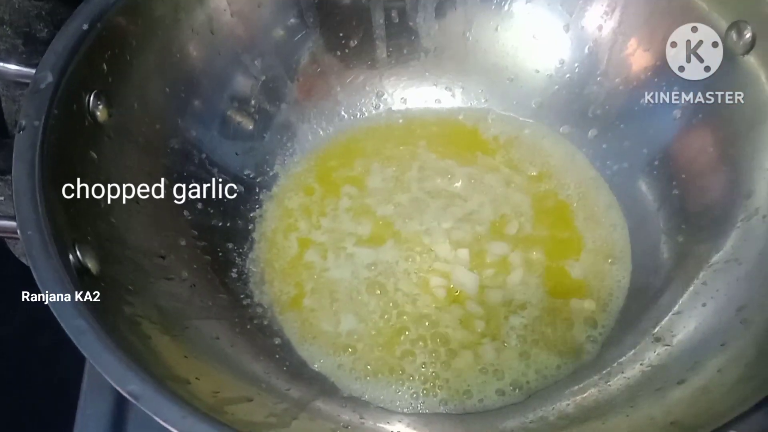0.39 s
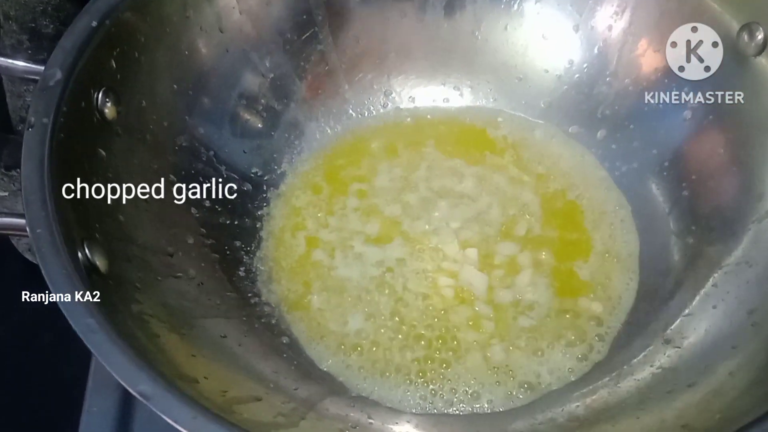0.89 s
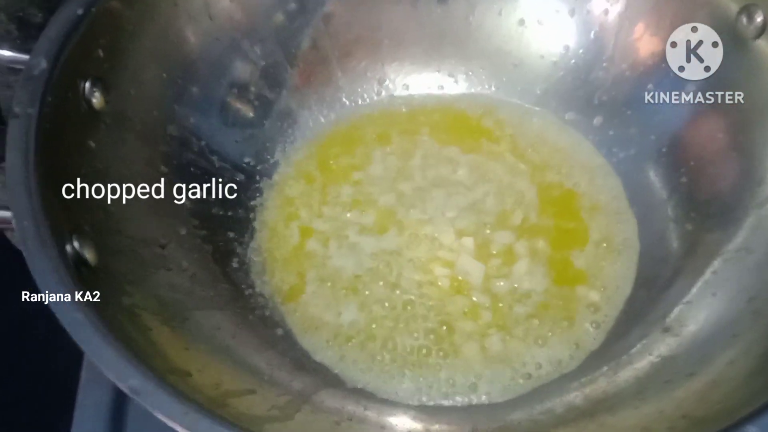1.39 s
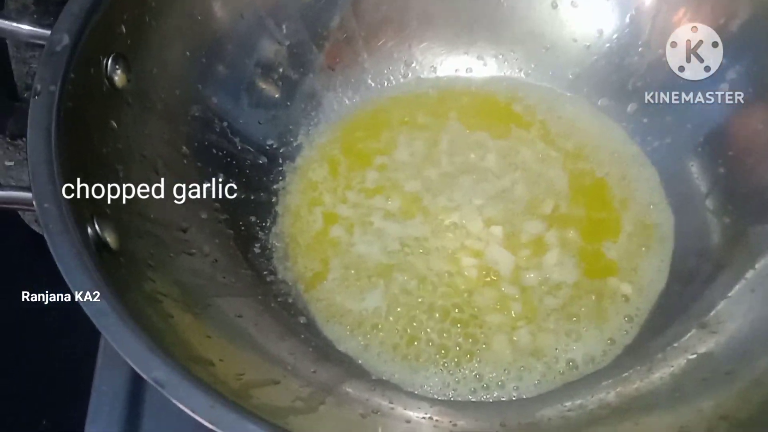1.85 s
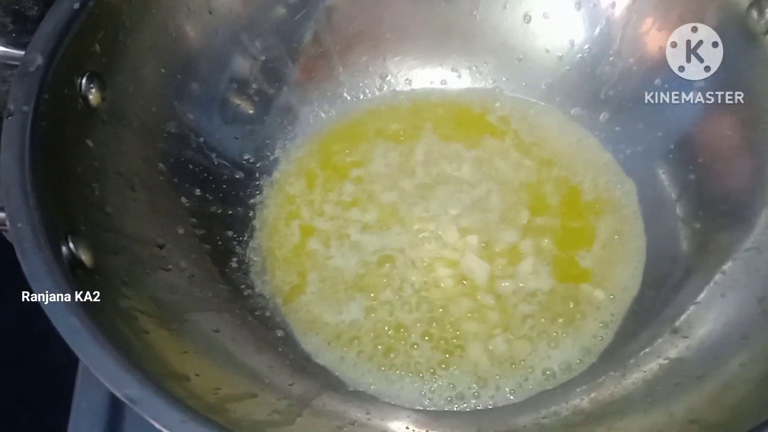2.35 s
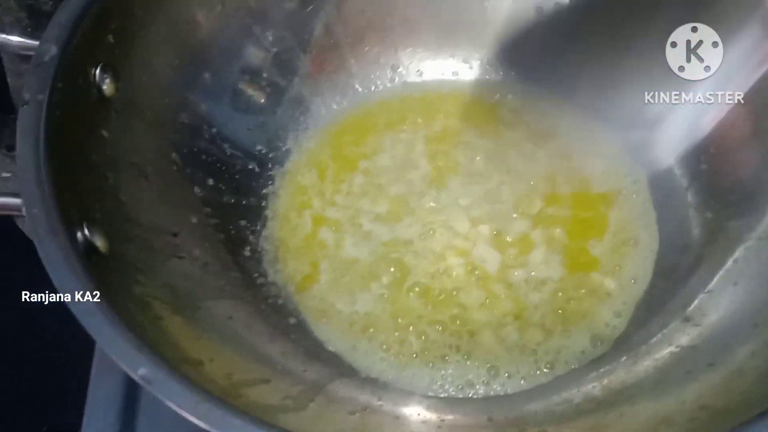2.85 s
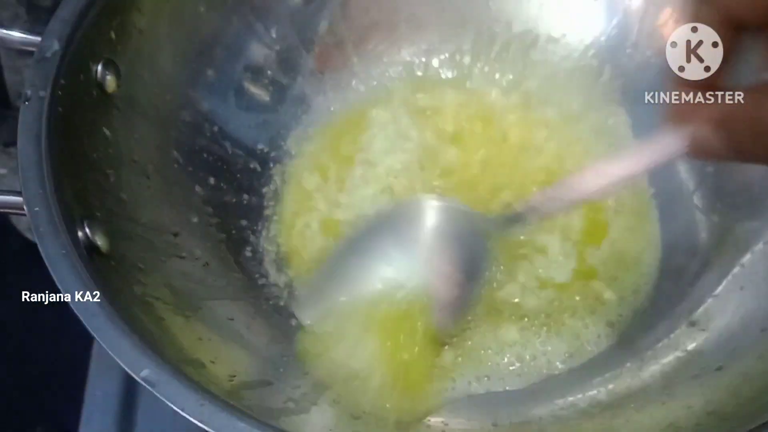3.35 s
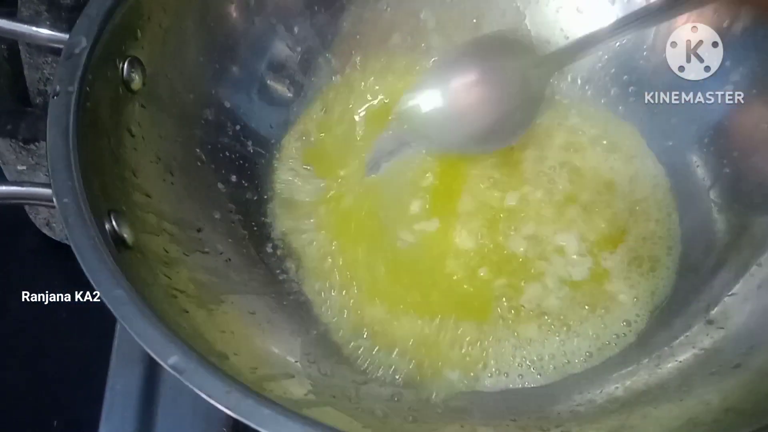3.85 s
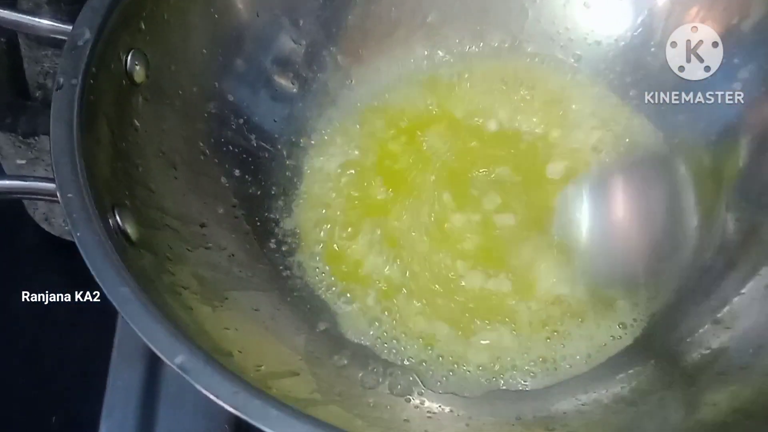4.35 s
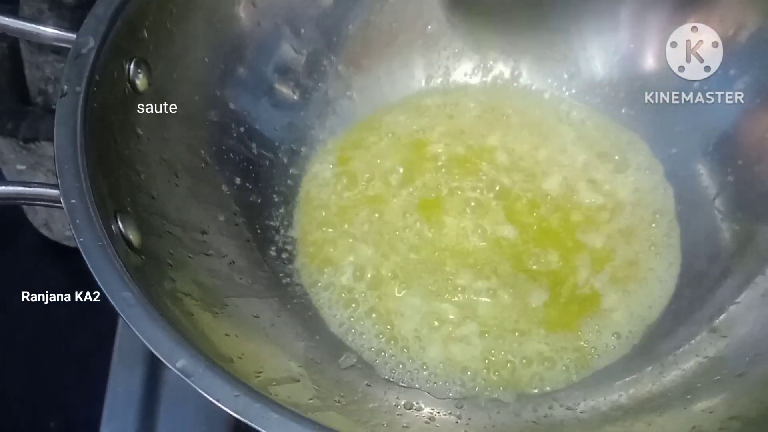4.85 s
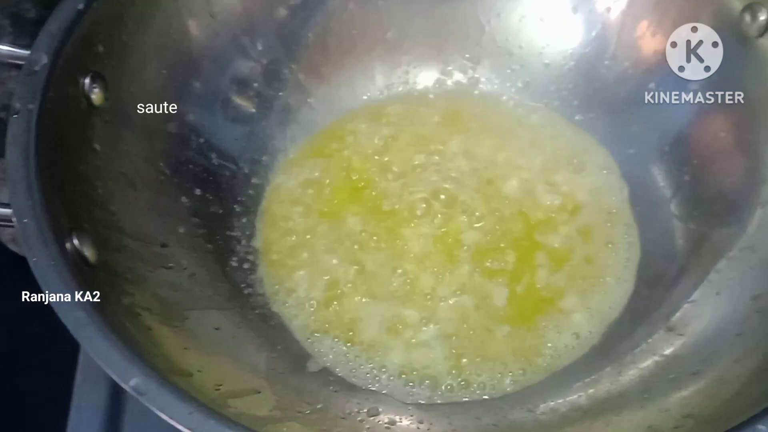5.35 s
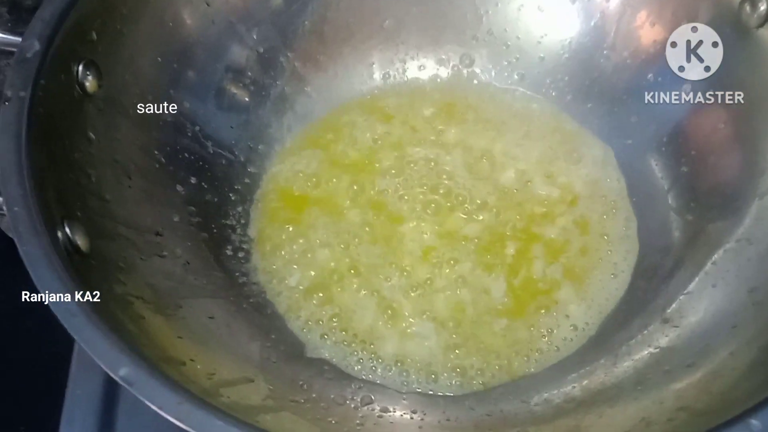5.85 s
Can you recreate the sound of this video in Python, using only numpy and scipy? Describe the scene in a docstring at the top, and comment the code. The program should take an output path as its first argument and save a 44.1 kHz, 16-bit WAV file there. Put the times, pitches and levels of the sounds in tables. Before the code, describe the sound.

Fine, bright sizzling of garlic in melted butter runs throughout, close to the microphone. Soft dull knocks sound off in the small kitchen during the first second, then two short hard clatters around one and a half seconds. From about three seconds a metal spoon taps and scrapes the steel pan, stopping before five, leaving the sizzle over steady faint hiss and low rumble.

```python
"""Chopped garlic sizzles in melted butter in a steel pan: steam bubbles, as damped sines, burst in clumps.
A spoon taps and scrapes the pan, close by in a small kitchen: noise and decaying modes ring the metal.
Dull knocks (damped low sines) and two clatters (coloured noise bursts) sound further off in the room.
Beneath lie steady hiss and low rumble, both filtered noise, and a faint wavering hum that swells briefly."""
import sys
import numpy as np
from scipy import signal
from scipy.fft import rfft, irfft, next_fast_len
from scipy.io import wavfile
from scipy.ndimage import uniform_filter1d, map_coordinates

SR = 44100
rng = np.random.default_rng(int(sys.argv[2]) if len(sys.argv) > 2 else 0)


def natural_amplitude(level_db):
    """Convert a level in decibels to a linear amplitude factor, elementwise."""
    exponent = np.asarray(level_db, float) / 20
    return 10 ** exponent


def transcribe(u):
    """Save the signal u as a 16-bit wav file named by the first command-line argument.

    u: samples, shape (n,) or (channels, n), limited to [-1, 1]; the rate is SR.
    q: integer samples, one column per channel.
    """
    v = np.clip(np.atleast_2d(u).T, -1, 1)
    q = np.round(v * 32767).astype(np.int16)
    wavfile.write(sys.argv[1], SR, q)


N = 263826  # length in samples

# Steady boiling. Each row: time in seconds, then small bubbles, finest fizz and large bubbles in dB.
BOILING = [(0.0, -49, -59, -61), (0.33, -58.5, -59.5, -74), (0.55, -52.5, -59.5, -73),
           (0.92, -61.5, -63, -65.5), (1.4, -50.5, -58.5, -64), (1.65, -61, -60, -65), (2.1, -57, -61, -57),
           (2.6, -53, -60, -54.5), (3.1, -51, -58.5, -57.5), (3.5, -54.5, -51, -47.5),
           (3.9, -57, -54.5, -53), (4.46, -65, -57.5, -60.5), (4.7, -59, -60.5, -68),
           (5.06, -48.5, -72, -59.5), (5.45, -60, -82, -62), (5.75, -52.5, -77, -65.5),
           (5.98, -56.5, -60, -62)]
# Bubble sizes, in the same order. Each row: pitch in Hz, spread in octaves, life in cycles, bursts per second.
BUBBLE_SIZES = [(4900, 0.168, 5.7, 680), (7500, 0.093, 5.1, 710), (3382, 0.212, 4.1, 950)]
# Loudest single bursts. Each row: start in seconds, level in dB, pitch in Hz.
SINGLE_BURSTS = [(0.059, -34.5, 3890), (0.1491, -46, 5140), (0.167, -35, 5000), (0.242, -32, 5850),
                 (0.3037, -31.5, 4640), (0.4599, -32.5, 3870), (0.4882, -34.5, 4150), (0.5144, -35, 4730),
                 (0.5511, -32, 4170), (0.87, -35, 4900), (0.8913, -33, 4900), (0.9383, -41, 3880),
                 (1.2336, -56, 3700), (1.3958, -32, 5050), (1.939, -50, 4900), (1.968, -28, 4000),
                 (1.983, -23.5, 3900), (2.0303, -30.5, 5030), (2.109, -36, 4870), (2.187, -43, 2700),
                 (2.356, -36.5, 2960), (2.376, -34, 3170), (2.458, -43, 2970), (2.5278, -35, 5400),
                 (2.595, -39, 3500), (2.7017, -40.5, 3760), (3.4555, -41, 3880), (3.518, -30, 3750),
                 (3.626, -38, 5270), (3.717, -35, 3680), (3.775, -35, 4600), (4.109, -38, 3770),
                 (4.402, -36, 4170), (4.319, -29, 4500), (4.347, -33, 4900), (4.546, -32, 4860),
                 (4.6572, -36.5, 4250), (4.774, -42, 4670), (4.822, -34, 4650), (4.952, -37, 4570),
                 (5.221, -40, 4700), (5.2574, -31, 4860), (5.2997, -31, 4860), (5.422, -36, 4650),
                 (5.4826, -40.5, 4700), (5.5544, -44, 4800), (5.592, -36.5, 5070), (5.6046, -37.5, 4770),
                 (5.657, -38, 4720), (5.663, -45, 4750), (5.6789, -29, 4800), (5.684, -28, 4760),
                 (5.704, -35, 4850), (5.7376, -36, 4600), (5.8146, -34.5, 4730), (5.845, -41, 4730),
                 (5.857, -35.5, 4860), (5.9174, -38, 4600)]


def sizzle():
    """Random superposition: bubbles of three sizes burst by chance under clumps, spits and loud single bursts."""
    out = clumps() + spits()
    for (hz, spread, cycles, rate), db in zip(BUBBLE_SIZES, curves(BOILING)):
        draw = rng.random((int(rate * N / SR), 2))
        chance = rng.standard_normal((len(draw), 2))
        start = draw[:, 0] * N / SR
        size = natural_amplitude(np.minimum(-3.5 * np.log(draw[:, 1]), 13))  # few big, many small
        pitch = hz * 2 ** (spread * chance[:, 0])
        life = cycles * np.exp(0.76 * chance[:, 1])
        grains = bubbles(start, pitch, size, life, rise=0.022)
        flicker = natural_amplitude(1.64 * wobble(35) + 1.13 * wobble(14))
        out += natural_amplitude(db) * unit(flicker * grains)
    s, db, hz = np.transpose(SINGLE_BURSTS)
    return out + bubbles(s, hz, natural_amplitude(db), np.full(len(s), 5.5), rise=0.01)


def bubbles(s, hz, peak, cycles, rise):
    """Damped oscillation: sines with a soft start whose pitch climbs as each bubble opens."""
    k = np.arange(320)
    u = k / SR * (hz / cycles)[:, None]  # time in lives
    envelope = np.e * 2 * u * np.exp(-2 * u)
    phase = 2 * np.pi * cycles[:, None] * (u + rise * u * u / 2)
    at = (s * SR).astype(int)[:, None] + k
    waves = peak[:, None] * envelope * np.sin(phase)
    return np.bincount(at.ravel(), waves.ravel(), N + SR)[:N]


# Patches of like-sized bubbles boiling up together.
# Each row: middle in seconds, length in seconds, level in dB, pitch in Hz.
BUBBLE_CLUMPS = [(0.077, 0.037, -47, 4000), (.12, 0.032, -53.5, 3900), (0.182, 0.047, -44, 4290),
                 (0.208, .05, -44, 4750), (.245, 0.042, -53, 5550), (0.288, 0.051, -59, 7500),
                 (0.312, 0.035, -46.5, 4870), (0.333, .03, -62, 7840), (0.404, .04, -49.5, 5300),
                 (0.421, 0.033, -54, 7500), (0.488, 0.051, -51, 4620), (0.534, 0.051, -51, 7500),
                 (0.557, .04, -51, 4370), (0.609, 0.038, -52, 3480), (0.726, 0.043, -47, 5460),
                 (.76, 0.037, -48, 5850), (0.833, 0.034, -45.5, 4900), (.88, 0.034, -54, 4900),
                 (0.956, 0.03, -55, 3700), (0.998, 0.037, -54, 4900), (1.139, 0.098, -48, 4300),
                 (1.143, 0.029, -49, 7500), (1.26, .06, -45.5, 3510), (1.699, 0.035, -47, 5030),
                 (1.958, 0.051, -41.5, 4840), (1.998, 0.055, -37, 4680), (2.121, 0.043, -57, 4900),
                 (2.205, .06, -45.5, 4660), (2.271, 0.036, -45.5, 5850), (2.29, .06, -49.5, 3230),
                 (2.373, 0.047, -47, 3220), (2.392, .04, -42.5, 5380), (2.529, 0.027, -53, 3750),
                 (2.612, 0.042, -47, 3460), (2.662, .06, -47.5, 3400), (2.767, .04, -44.5, 3700),
                 (2.934, .12, -41.5, 3700), (3.077, 0.086, -43, 4240), (3.19, 0.027, -52, 5600),
                 (3.496, .1, -37.5, 3650), (3.49, 0.11, -38, 7500), (3.806, 0.044, -41, 3300),
                 (3.835, .07, -38.5, 4900), (3.823, 0.037, -39.5, 7500), (4.089, 0.056, -44, 7700),
                 (4.109, 0.042, -43, 4700), (4.186, 0.064, -44, 4900), (4.318, 0.029, -48, 4670),
                 (4.362, 0.051, -42, 4800), (4.404, 0.052, -40.5, 3950), (4.474, 0.022, -41, 4400),
                 (4.55, 0.034, -48, 4900), (4.665, 0.027, -47.5, 4530), (4.845, 0.09, -46.5, 4590),
                 (5.001, 0.059, -46, 4400), (5.1, 0.047, -46, 4240), (5.246, 0.057, -46.5, 4550),
                 (5.43, 0.057, -46.5, 4660), (5.488, .03, -60, 3200), (5.605, .05, -52, 4900),
                 (5.691, 0.064, -44.5, 4300), (5.811, 0.049, -47.5, 3960), (5.915, 0.042, -49, 4370)]


def clumps(count=48):
    """Clustered bursting: each patch breaks out suddenly and thins away, its bubbles scattered about one size."""
    s, length, db, hz = np.transpose(BUBBLE_CLUMPS)[:, :, None]
    draw = rng.random((len(BUBBLE_CLUMPS), count, 3))
    chance = rng.standard_normal((len(BUBBLE_CLUMPS), count, 2))
    at = np.abs(s + length * (1.6 * draw[..., 0] * draw[..., 1] - 0.45))
    size = natural_amplitude(db + np.minimum(-3.0 * np.log(draw[..., 2]), 9) - 6)
    pitch = hz * 2 ** (0.12 * chance[..., 0])  # spread in octaves
    life = 5.68 * np.exp(0.42 * chance[..., 1])  # cycles
    return bubbles(at.ravel(), pitch.ravel(), size.ravel(), life.ravel(), rise=0.025)


# Distinct tiny spits, short and high. Each row: start in seconds, level in dB, pitch in Hz.
CLEAR_SPITS = [(2.562, -39, 14800), (2.831, -44, 9300), (5.542, -58, 12800), (5.7139, -47, 15000),
               (5.7349, -53, 15000), (5.9414, -57, 9260)]


def spits():
    """Flash evaporation: water droplets turn to steam in the fat, as clicks with a life of 2.5 cycles."""
    count = int(33 * N / SR)  # fainter ones at random, 33 per second
    draw, chance = rng.random((count, 2)), rng.standard_normal(count)
    s, db, hz = np.transpose(CLEAR_SPITS)
    s = np.append(s, draw[:, 0] * N / SR)
    db = np.append(db, -57 + np.minimum(-3.5 * np.log(draw[:, 1]), 10))
    hz = np.append(hz, np.clip(5970 * 2 ** (0.75 * chance), 1500, 15000))
    return bubbles(s, hz, natural_amplitude(db), np.full(len(s), 2.5), rise=0.01)


# Steady shaking of the pan. Each row: time in seconds, pan wall in dB, spray in dB.
SHAKING = [(0.0, -65.5, -79), (0.4, -71.5, -84), (1.4, -78.5, -82), (2.0, -67, -81), (2.9, -66, -75),
           (3.2, -59.5, -63), (3.38, -58.5, -62), (3.48, -53.5, -64), (3.65, -56.5, -68), (3.8, -60, -74),
           (3.9, -62, -78), (4.3, -69, -72), (4.6, -71, -85), (4.8, -74, -73), (5.5, -80, -84),
           (5.98, -65, -78)]
# Brief jolts of the wall as big bubbles collapse on it. Each row: middle and length in seconds, level in dB.
WALL_JOLTS = [(0.13, 0.021, -74), (0.223, 0.032, -59.5), (0.832, 0.034, -61), (0.952, .05, -63.5),
              (1.217, .06, -63), (1.327, 0.035, -63), (2.131, 0.024, -60), (2.178, .04, -58.5),
              (2.273, 0.047, -64), (2.61, 0.094, -61.5), (4.90, 0.044, -65.5), (5.106, 0.024, -69),
              (5.235, 0.028, -67), (5.374, 0.035, -63), (5.65, 0.037, -70)]
# Stirring strokes. Each row: middle and length in seconds, pan wall in dB,
# then low, middle and high spoon modes in dB.
STIRRING = [(2.965, 0.027, -57, -74, -73, -66), (3.26, 0.12, -54, -67, -60, -55.5),
            (3.442, 0.027, -48, -66, -57, -59), (3.494, 0.061, -48.5, -43, -46, -50),
            (3.628, 0.1, -67, -55, -70, -54), (3.698, 0.039, -53, -54, -54, -52.5),
            (3.742, 0.068, -50.5, -63, -64, -65), (3.809, 0.085, -53.5, -47, -53, -50),
            (3.962, 0.12, -58, -66, -59, -60), (4.038, 0.09, -55, -59, -73, -59),
            (4.162, 0.046, -58, -57, -50, -69), (4.212, 0.055, -58, -61, -48, -60),
            (4.31, 0.067, -79, -71, -61, -60), (4.402, 0.12, -59, -66, -71, -62),
            (4.488, 0.089, -60, -56, -64, -57.5), (4.568, 0.074, -75, -63.5, -62, -55.5),
            (4.619, .04, -61.5, -66, -77, -75), (4.745, 0.023, -62, -83, -76, -79)]
# Pan resonances. Each row: frequency in Hz, width in Hz, relative level in dB.
PAN_MODES = [(328, 16, -14.5), (1063, 120, -6.5), (1390, 98, -6.5), (1802, 126, 2.5), (3240, 57, -9),
             (3703, 95, 3.5), (4420, 1100, -6.5)]
# Spectrum of friction noise. Each row: frequency in Hz, relative density in dB per Hz.
FRICTION = [(200, -1.5), (700, -1), (2500, 4.5), (5000, 2), (9000, -19), (12000, -36), (15500, -48)]
# Spectrum of fine spray. Each row: frequency in Hz, relative density in dB per Hz.
SPRAY = [(8000, 2), (10000, -15.5), (12000, -6.5), (13500, -13), (15500, -21)]


def pan():
    """Forced resonance: short irregular jolts ring the pan wall; stirred butter throws a fine spray."""
    wall_db, spray_db = curves(SHAKING)
    collapses = swells(*np.transpose(WALL_JOLTS))
    strokes = swells(*np.transpose(STIRRING)[:3])
    wall_gain = np.hypot(natural_amplitude(wall_db), np.hypot(collapses, strokes))
    jolts = rng.standard_normal((2, N)) * natural_amplitude(4.1 * wobble(160) + 1.5 * wobble(30))
    wall = unit(filtered(jolts[0], resonances(PAN_MODES)))
    hiss = unit(filtered(jolts[1], lambda hz: natural_amplitude(along(FRICTION, hz))))
    droplets = rng.standard_normal(N) * natural_amplitude(1.4 * wobble(66) + 2.5 * wobble(20))
    spray = unit(filtered(droplets, lambda hz: natural_amplitude(along(SPRAY, hz) - 60 * (hz < 7000))))
    return wall_gain * (wall + natural_amplitude(-1.5) * hiss) + natural_amplitude(spray_db) * spray


# Spoon modes. Each row: frequency in Hz, relative level in dB, 60 dB decay time in seconds.
SPOON_MODES = [(2228, -17, 0.044), (2867, 4.5, 0.089), (2950, 8, 0.033), (4860, -43, 0.09),
               (5763, -10, 0.076), (7500, -7.5, 0.037), (7700, -2, 0.087), (9070, 5, 0.025)]
# How strongly dragging drives each spoon mode, against a tap: one value in dB per mode.
DRAG_LIFT = [35, -24, -32, 32.5, 5, 17, 18, -1]


def drag():
    """Stick-slip excitation: friction sustains the spoon's modes, which come and go as the contact moves."""
    modes = []
    for (hz, db, t60), lift_db in zip(SPOON_MODES, DRAG_LIFT):
        width = 1.5 * np.log(1000) / np.pi / t60  # Hz, half as wide again as the free ring
        modes.append((hz, width, db + lift_db))
    s, length, _, *levels = np.transpose(STIRRING)
    out = np.zeros(N)
    for db, group in zip(levels, (modes[:3], modes[3:5], modes[5:])):
        slips = rng.standard_normal(N) * natural_amplitude(3.5 * wobble(120))
        singing = sum(filtered(slips * natural_amplitude(2.2 * wobble(12)), resonances([mode])) for mode in group)
        out += swells(s, length, db) * unit(singing)
    return out


# Spoon taps. Each row: start in seconds, level in dB, relative spoon ring in dB, brightness above 7 kHz in dB.
SPOON_TAPS = [(2.947, -35, -3.5, 6.5), (3.2116, -24.5, 2.5, -3.5), (3.425, -38, -14, 11),
              (3.47, -22, -12, -22), (3.691, -22, -15, -4), (3.7972, -28, -12, -22), (3.951, -36, -13, -9),
              (4.033, -29, -34, -20), (4.152, -25.5, -33, -21), (4.258, -30, -23, -21),
              (4.487, -26, -20, -21), (4.603, -39, -9, -8), (4.734, -34, -34, -6)]


def spoon():
    """Impact excitation: every tap knocks the pan wall and rings the spoon, each by its own amount."""
    out, t = np.zeros(N), np.arange(SR // 4) / SR
    strike = (1 - np.exp(-t / 0.000089)) * (1 + 1.2 * natural_amplitude(-60 * t / 0.019))  # louder while still in contact
    for s, db, ring_db, bright_db in SPOON_TAPS:
        lift = lambda hz: bright_db * (hz > 7000)
        ring = np.zeros(len(t))
        for hz, level, t60 in SPOON_MODES:
            mode_db = level + lift(hz) + rng.normal(0, 0.5) - 60 * t / t60
            ring += natural_amplitude(mode_db) * np.sin(2 * np.pi * hz * t)
        crack = natural_amplitude(-60 * t / 0.0034) * rng.standard_normal(len(t))
        treble = lambda hz: natural_amplitude(lift(hz) - 18 * (hz > 10500))
        bass_cut = lambda hz: (hz / (hz - 700j)) ** 2
        knock = filtered(crack, lambda hz: (resonances(PAN_MODES)(hz) + 0.12) * treble(hz) * bass_cut(hz))
        blow = natural_amplitude(ring_db - 16) * ring * strike + natural_amplitude(-5.5) * knock / np.abs(knock).max()
        out = in_room(s, natural_amplitude(db) * blow, -6, out)
    return out


# Dull knocks. Each row: start in seconds, relative level in dB, centre in Hz.
DULL_KNOCKS = [(.004, -49, 470), (0.173, -53, 288), (0.222, -53.5, 293), (0.292, -41.5, 493),
               (0.33, -52, 199), (.350, -48.5, 403), (.432, -44, 394), (.518, -40.5, 467), (.572, -48, 840),
               (.615, -39, 463), (0.813, -36, 504), (5.90, -38.5, 480), (5.917, -45, 520)]


def knocks():
    """Heavily damped vibration: soft distant blows, a rounded hollow swing over a weak low push, then the room."""
    out, t = np.zeros(N), np.arange(1500) / SR

    def swing(hz):
        """Proportional damping: a soft-started sine that dies by 60 dB in 4.5 cycles."""
        return np.sin(2 * np.pi * hz * t) * natural_amplitude(-60 * t * hz / 4.5) * (1 - np.exp(-t / 0.0012))

    for s, db, hz in DULL_KNOCKS:
        out = in_room(s, natural_amplitude(db + 10) * (swing(hz) + natural_amplitude(-12) * swing(182)), -3.0, out)
    return filtered(out, lambda hz: (hz / (hz - 110j)) ** 2)


# Blows of the clatters. Each row: start in seconds, relative level in dB, tilt in dB per octave,
# time to fall 20 dB in seconds, relative high chink in dB.
CLATTER_BLOWS = [(1.458, -40.5, -4, 0.0057, -4), (1.4865, -32, -6, 0.0046, -3),
                 (1.491, -38, 19.5, 0.0046, 15), (1.51, -40, -5, 0.011, -21), (1.556, -46, 3, 0.006, -30),
                 (1.722, -28, 1.5, 0.006, -40), (1.751, -31.5, -1.5, 0.022, -36),
                 (1.757, -22.5, 2.5, 0.0081, -45), (1.772, -26.5, 0.5, 0.008, -49)]
# Colour of the clatters. Each row: frequency in Hz, relative density in dB per Hz.
CLATTER_COLOUR = [(150, -53), (300, -23), (390, -5), (900, 2.5), (2000, 4), (3600, 5), (5200, 0.5),
                  (7000, -10), (8500, -9), (10200, -22.5), (12000, -27), (15500, -47)]
# Low ringing shared by both clatters. Each row: frequency in Hz, width in Hz, relative level in dB.
WARE_MODES = [(248, 52, -18), (417, 8, -0.5), (492, 40, -0.5), (627, 15, 2), (811, 12, 1), (985, 18, 2),
              (1340, 23, 0), (2133, 47, 8), (2233, 27, -1), (2700, 19, 6)]


def clatter():
    """Broadband impact in a reverberant field: hard things rattle together across the room."""
    out, t = np.zeros(N), np.arange(4000) / SR
    lead = 200  # samples of silence ahead of each blow, taken off its start again
    for s, db, tilt_db, length, chink_db in CLATTER_BLOWS:
        rattle = np.pad(rng.standard_normal(len(t)) * natural_amplitude(-20 * t / length), (lead, 0))
        # hard contacts excite every band alike
        lumps = np.sqrt(uniform_filter1d(np.abs(rfft(rattle)) ** 2, size=31))
        even = lambda hz: 1 / np.interp(hz, np.linspace(0, SR / 2, len(lumps)), lumps)
        tilt = lambda hz: natural_amplitude(tilt_db * np.log2(np.clip(hz, 400, 9000) / 2000))
        ringing = lambda hz: natural_amplitude(along(CLATTER_COLOUR, hz)) + natural_amplitude(3) * resonances(WARE_MODES)(hz)
        chink = resonances([(13150, 210, chink_db + 11), (15000, 710, chink_db - 40)])
        blow = filtered(rattle, lambda hz: ringing(hz) * tilt(hz) * even(hz))
        high = filtered(rattle, lambda hz: chink(hz) * even(hz))
        gain = natural_amplitude(db) / np.std(blow[lead:lead + round(length * SR)])
        out = in_room(s - lead / SR, gain * blow, 0.41, out)
        out = in_room(s - lead / SR, gain * high, -9, out)
    return out


# Spectrum of the background noise. Each row: frequency in Hz, relative gain in dB.
NOISE_FLOOR = [(20, -32), (92, -1.5), (187, -9.5), (393, -8.5), (947, -17.5), (1780, -18.5), (2480, -18),
               (4920, -11.5), (6840, -6), (7640, -7.5), (10600, -32), (13500, -41), (15300, -27.5)]
# Rumble. Each row: time in seconds, then relative levels of the deep, low and upper registers in dB.
RUMBLE_LEVELS = [(0.0, -72.5, -72.5, -79), (0.6, -78.5, -72.5, -75.5), (1.2, -78.5, -74, -82),
                 (1.7, -75.5, -75, -77), (2.3, -74.5, -72, -87), (3.0, -78, -77, -78.5),
                 (3.5, -81, -77, -70), (3.9, -75, -77.5, -82), (4.3, -76, -75, -73.5),
                 (4.7, -75, -76.5, -80), (5.05, -75.5, -68.5, -79), (5.4, -71, -76.5, -84),
                 (5.8, -74, -74, -71.5), (5.98, -79, -71, -65.5)]
# Hum. Each row: time in seconds, pitch in Hz, level in dB.
HUM_PATH = [(4.15, 344, -79), (4.3, 364.4, -70), (4.75, 365, -69), (4.9, 346, -76), (5.02, 344, -71.5),
            (5.12, 339, -92)]


def background():
    """Stationary and modulated noise: steady hiss, a rumble whose registers swell apart, a faint wavering hum."""
    def air(lo, hi):
        """Band-pass filtering: noise of the floor's colour between lo and hi in Hz, at rms 1."""
        band = lambda hz: 1 / (1 + (hz / hi) ** 6) / (1 + (lo / (hz + 1)) ** 6)
        return unit(filtered(rng.standard_normal(N), lambda hz: natural_amplitude(along(NOISE_FLOOR, hz)) * band(hz)))

    edges = [(20, 130), (130, 250), (250, 480)]  # Hz
    rumble = sum(natural_amplitude(db + 2.5 + 1.03 * wobble(6)) * air(*edge)
                 for db, edge in zip(curves(RUMBLE_LEVELS), edges))
    hiss = natural_amplitude(-60.2 + 1.5 * wobble(5)) * air(480, SR)
    hz, db = curves(HUM_PATH)
    phase = 2 * np.pi * np.cumsum(hz + 4.7 * wobble(29)) / SR
    hum = natural_amplitude(db + 2.8 * wobble(8.5)) * np.sin(phase)
    return rumble + hiss + hum


# Decay of the kitchen. Each row: frequency in Hz, 60 dB decay time in seconds.
ROOM_DECAY = [(300, 0.16), (800, 0.25), (2000, 0.29), (5500, 0.23), (11000, 0.18), (14000, 0.13)]


def echo(length):
    """Diffuse reverberation: a new draw of the kitchen's answer, each frequency dying at its own speed."""
    hz, t, z = signal.stft(rng.standard_normal(length), SR, nperseg=256)
    decay = natural_amplitude(-60 * t / along(ROOM_DECAY, hz)[:, None])
    tail = signal.istft(z * decay, SR, nperseg=256)[1][:length]
    return tail / np.linalg.norm(tail)


def in_room(s, blow, wet_db, out):
    """Direct and reflected sound: adds to out a blow at s and its echo, which starts at the first wall."""
    wet = natural_amplitude(wet_db) * signal.fftconvolve(np.pad(blow, (150, 0)), echo(SR // 2))  # 150 samples later
    sound = wet + np.pad(blow, (0, len(wet) - len(blow)))
    start = round(s * SR)
    return out + np.pad(sound, (start, N))[:N]


def resonances(modes):
    """Modal superposition: causal response of (Hz, width Hz, dB) modes with alternating signs."""
    return lambda f: sum((-1) ** k * natural_amplitude(db) * 1j * f * w / (c * c - f * f + 1j * f * w)
                         for k, (c, w, db) in enumerate(modes))


def swells(s, length, db):
    """Incoherent addition: gain of separate rounded swells, added as power."""
    t, power = np.arange(N) / SR, np.zeros(N)
    for mid, span, level in zip(s, length, db):
        near = slice(max(round((mid - span) * SR), 0), round((mid + span) * SR))
        power[near] += (natural_amplitude(level) * np.cos(np.pi / 2 * (t[near] - mid) / span) ** 2) ** 2
    return np.sqrt(power)


def filtered(x, response):
    """Linear filtering: the spectrum of x times a complex response of frequency."""
    m = next_fast_len(len(x) + 8192)
    return irfft(rfft(x, m) * response(np.fft.rfftfreq(m, 1 / SR)), m)[:len(x)]


def wobble(rate):
    """Slow random modulation: a smooth curve with rate knots a second."""
    knots = rng.standard_normal(int(N * rate / SR) + 4)
    return map_coordinates(knots, [np.arange(N) * rate / SR])


def curves(rows):
    """Linear interpolation in time: one value per sample for each column after the time."""
    s, *cols = np.transpose(rows)
    return [np.interp(np.arange(N) / SR, s, c) for c in cols]


def along(points, hz):
    """Logarithmic frequency scale: interpolates (Hz, value) points on a log axis."""
    f, v = np.transpose(points)
    return np.interp(np.log(hz + 1), np.log(f + 1), v)


def unit(x):
    """Normalisation by mean power: x scaled to rms 1."""
    return x / np.sqrt(np.mean(x ** 2) + 1e-20)


# Pitches favoured by the air in the pan. Each row: frequency in Hz, width in Hz, level in dB.
BOWL_AIR = [(4826, 82, -11.5), (3750, 33, -46)]


def scene():
    """Superposition of sources: the pan close by, the kitchen around it."""
    fry = filtered(sizzle(), lambda hz: 0.62 + resonances(BOWL_AIR)(hz)) + pan() + drag()
    fry = fry + natural_amplitude(-7.5) * signal.fftconvolve(fry, echo(SR // 2))[:N]
    return (fry + spoon() + knocks() + clatter() + background())[None]


def band_limit(x):
    """A steep low-pass at the top of the band."""
    return signal.sosfilt(signal.butter(12, 16110, fs=SR, output="sos"), x)


# Cancellation in the microphone port: centre in Hz, width in Hz, depth in dB.
PORT_NOTCH = (6850, 900, -12)


def record(dry):
    """Transducer response: the microphone loses the deep bass and its port cancels one narrow band."""
    centre, width, depth_db = PORT_NOTCH
    notch = lambda hz: 1 - (1 - natural_amplitude(depth_db)) * resonances([(centre, width, 0)])(hz)
    bass_cut = lambda hz: (hz / (hz - 60j)) ** 2
    heard = filtered(dry[0], lambda hz: notch(hz) * bass_cut(hz) * (hz < 15650))  # nothing above 15650 Hz
    return band_limit(heard[None])


dry = scene()
out = record(dry)
transcribe(out)
```